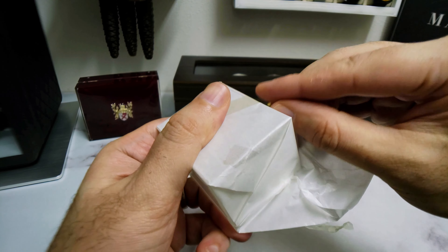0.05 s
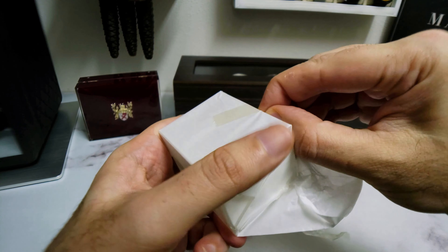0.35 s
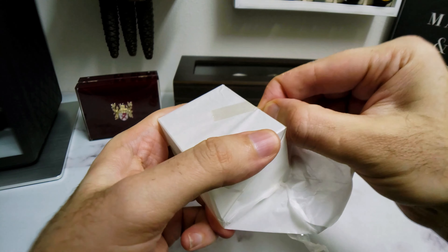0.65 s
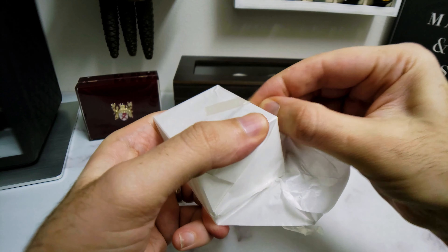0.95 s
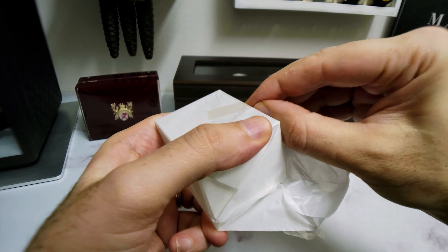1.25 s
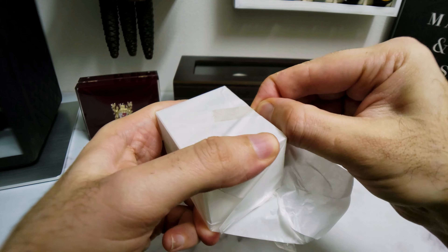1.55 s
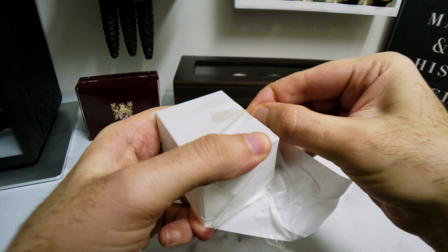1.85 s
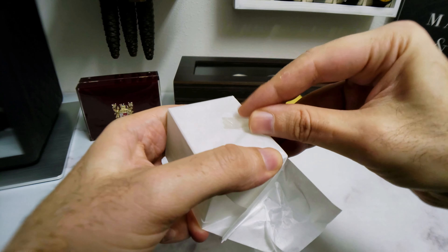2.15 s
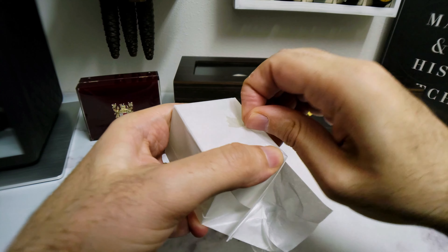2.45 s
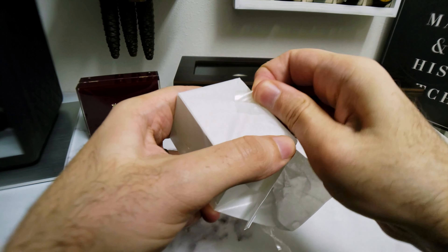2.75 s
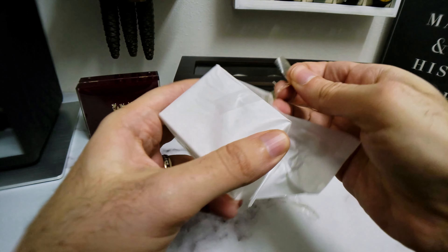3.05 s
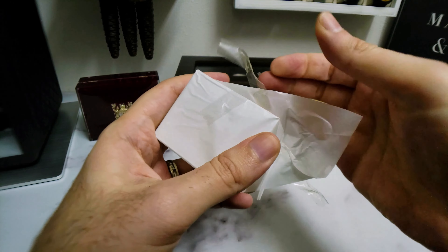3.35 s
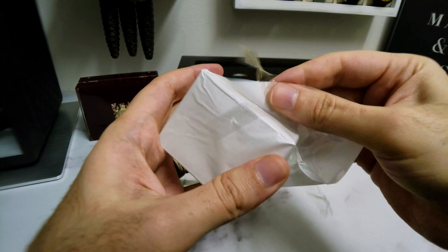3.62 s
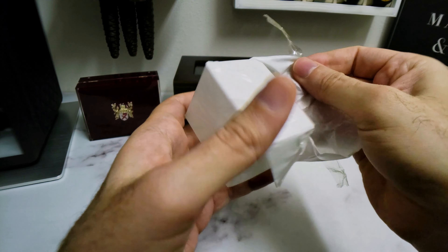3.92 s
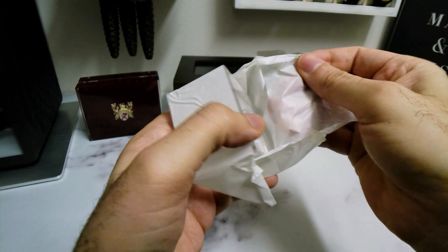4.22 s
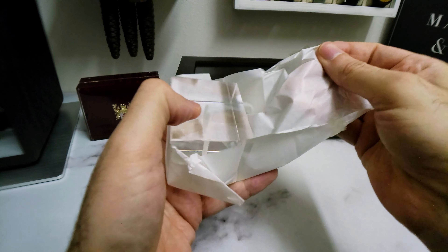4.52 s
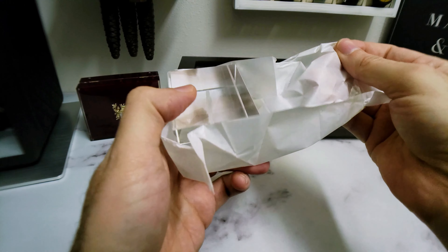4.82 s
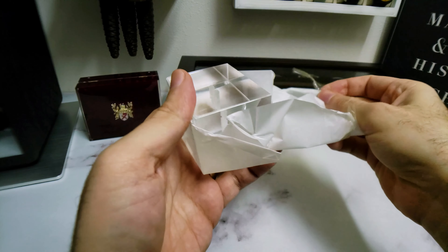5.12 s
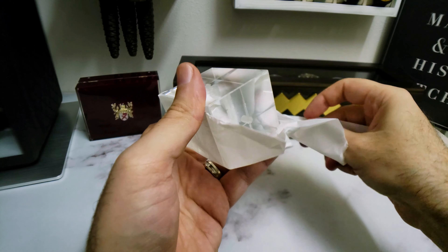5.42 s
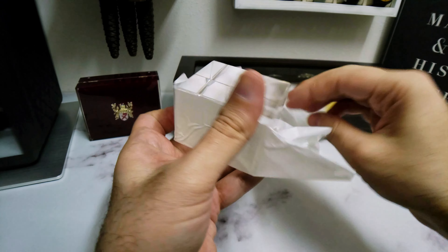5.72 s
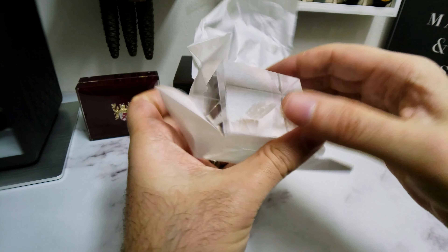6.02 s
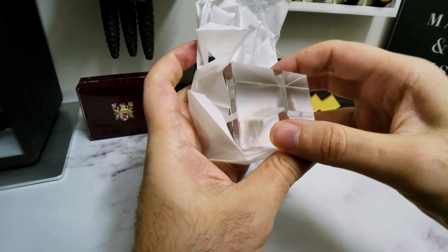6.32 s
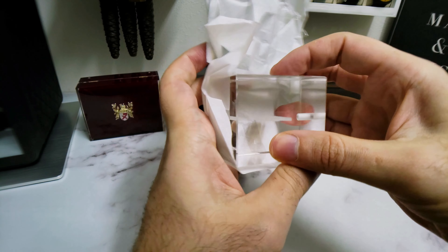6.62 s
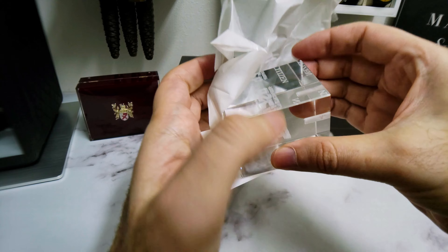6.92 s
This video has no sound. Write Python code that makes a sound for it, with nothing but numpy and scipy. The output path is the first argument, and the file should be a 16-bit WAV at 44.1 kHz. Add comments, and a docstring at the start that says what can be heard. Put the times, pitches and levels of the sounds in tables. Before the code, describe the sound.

Thin wrapping paper ticks and snaps as tape is peeled away, then crinkles densely as hands unwrap a small object.

```python
"""A desk in a quiet room, close to a stereo microphone. Fingers pick at the tape on a small
paper-wrapped glass block, peel it off, unfold the crinkly paper and lift the block out.
Each buckling crease snaps and rings briefly in the sheet; swarms of tiny creases crackle between
the snaps. Fingers bump and rub the parcel, over a low room murmur and microphone hiss."""
import sys
import numpy as np
from scipy import signal
from scipy.fft import rfft, irfft
from scipy.io import wavfile
from scipy.ndimage import uniform_filter1d

SR = 44100
rng = np.random.default_rng(int(sys.argv[2]) if len(sys.argv) > 2 else 0)


def materialize(psi):
    """Save the field psi as 16-bit PCM at rate SR to the path in sys.argv[1].

    A 1-D psi becomes a single channel; in a 2-D psi each row is a channel.
    """
    bounded = np.clip(np.atleast_2d(psi).T, -1, 1)
    quanta = np.round(bounded * 32767).astype(np.int16)
    wavfile.write(sys.argv[1], SR, quanta)


N = 316197
TIME = np.arange(N) / SR
SIZE = 8192  # samples in one hit
AGE = np.arange(SIZE) / SR
HZ = np.maximum(np.fft.rfftfreq(SIZE, 1 / SR), 1)


# Snap cues: a nail picks, the tape peels (from 2.5 s), the sheet unfolds (3.6 s), the block lifts (6 s).
# Level sets the treble; the body of the sheet (mids) and hollow of the parcel (lows) are relative to it.
# (time [s], level [dB], body [dB], hollow [dB], ring [Hz])
SNAP_CUES = [ (.009, -8.5, -7.5, -19.5, 1930), (.024, -16.5, -6.5, -11.5, 2730),
             (.158, -31, -3.5, -13.5, 3530), (0.193, -32.5, -4, -17, 9500), (.223, -11, -1.5, -22, 2000),
             (.23, -19.5, -5, -9, 1680), (.322, -23.5, -1.5, -27, 1650), (.425, -35.5, 4.5, -12, 1530),
             (0.475, -22, -20, -50, 8600), (.511, -27, -13, -41, 6500), (.576, -24, -12, -35, 4700),
             (0.601, -32.5, -11, -38, 4300), (.667, -26, -1, -12, 5580), (0.759, -9, -3.5, -14, 2200),
             (.806, -32, -2, -6, 3490), (0.909, -32, -7.5, -43, 3280), (1.012, -23.5, 1, -6, 1580),
             (1.039, -23.5, -7, -18, 11100), (1.086, -22, -32, -18, 5080), (1.155, -19.5, -2.5, -12.5, 930),
             (1.209, -25.5, -8, -22, 9200), (1.256, -17.5, -25, -39, 4700), (1.332, -9, -5, -7, 1940),
             (1.479, -29, -2, -21.5, 8100), (1.564, -15, -8.5, -53, 4000), (1.587, -23, -14, -42, 9500),
             (1.644, -21.5, -10.5, -14, 1000), (1.71, -24.5, -16.5, -46, 3880),
             (1.903, -17.5, -16, -35, 3680), (1.925, -26.5, -7, -23, 10600), (1.965, -25, -5, -10, 1590),
             (1.973, -22.5, -6.5, -8.5, 1570), (2.113, -18, -16.5, -28, 11000),
             (2.172, -30.5, -10.5, -20, 11100), (2.312, -20.5, -23.5, -33, 10100),
             (2.391, -27, -7, -44, 8300), (2.431, -25.5, -9, -22, 11500), (2.502, -16, -14.5, -28, 9600),
             (2.695, -18.5, -13, -46, 9550), (2.779, -21.5, -11.5, -10, 1800),
             (2.817, -17.5, -10, -22, 1810), (2.835, -13.5, -15, -22, 8460), (2.864, -10.5, -13, -22, 6450),
             (2.874, -16.5, -3.5, -15, 8400), (2.891, -19, -10, -19, 5500), (2.999, -26.5, -9, -7.5, 5270),
             (3.04, -22, -5.5, -6.5, 1140), (3.123, -30, 0.5, -5, 2960), (3.148, -43.5, 3, 4, 1420),
             (3.25, -17.5, -15, -6, 910), (3.255, -13, -2, -6.5, 3500), (3.586, -13.5, -7, -18.5, 11700),
             (3.622, -15, -3.5, -22, 6240), (3.702, -11.5, -10.5, -14, 1900), (3.807, -18, -2, -4.5, 1420),
             (3.849, -18.5, -6, -20, 5080), (3.917, -13.5, -5.5, -45, 5750), (3.972, -21, 2.5, -0.5, 2070),
             (3.988, -7, -13, -22, 4940), (4.014, -13, -8.5, -21, 1450), (4.077, -19.5, 4, 0, 2700),
             (4.097, -12, -2, -7, 1010), (4.18, -15.5, -29, -5, 1540), (4.245, -24, 2, -18, 2330),
             (4.305, -11.5, -4.5, -13, 5160), (4.442, -19.5, 3, -3.5, 6650), (4.447, -8.5, -14, -32, 4900),
             (4.622, -20.5, -7.5, -9, 2750), (4.716, -22.5, -7.5, -3, 780), (4.782, -23.5, -4, -7.5, 9500),
             (4.834, -12.5, -7.5, -9.5, 2920), (4.889, -18.5, -6, -10, 3230), (4.945, -20, 3, -1, 1500),
             (4.961, -18, -2.5, -19, 4870), (5.006, -15, -5.5, -20, 4700), (5.116, -20, -7.5, -3, 1860),
             (5.208, -14, -8, -18, 3900), (5.223, -14, -6, -22, 4080), (5.288, -17.5, -8, -16, 9500),
             (5.332, -23, 1.5, -28, 9200), (5.429, -11.5, -11.5, -15.5, 1290), (5.468, -10, -8, -10, 2060),
             (5.753, -18.5, -10, -8.5, 8700), (5.782, -28.5, -2, 3.5, 9500), (5.813, -25, -16, -17, 1040),
             (5.876, -25, -5, -25, 6400), (5.975, -22, 1.5, -13, 2130), (6.092, -14.5, -3, -11, 8200),
             (6.179, -19, -6, -11, 1400), (6.227, -18, -20, -9, 1280), (6.321, -13, -0.5, -8.5, 1430),
             (6.395, -15, -20, -45, 10700), (6.416, -17.5, -6, -40, 7750), (6.465, -14, -9, -20, 1510),
             (6.555, -15, -2.5, -17, 9900), (6.608, -17.5, -17, -39, 5700), (6.708, -12, -15, -22, 1160),
             (6.855, -11.5, -22, -20, 1320), (6.926, -19.5, -11, -30, 2750),
             (7.152, -20.5, -3, -11.5, 2320)]

def snaps(direct_db=-2, t60=0.068, mode_db=7.5, mode_octaves=0.2, level_db=-2.0):
    """Big creases and the tape let go one at a time, each with one leading resonance."""
    band_widths_hz = np.diff([550, 1500, 5000, 16000])
    burst_db = 10 * np.log10(0.001 * SR * SR / 2 / band_widths_hz)  # a 1 ms burst's energy in each band
    out = np.zeros((2, N))
    for s, db, body_db, hollow_db, hz in SNAP_CUES:
        low, mid, high = db + np.array([hollow_db, body_db, 0]) + burst_db
        shape = [(100, low - 18), (480, low - 8), (650, low), (1250, low),
                 (1900, mid), (4200, mid), (6200, high), (16000, high)]
        shape_db = contour(shape, HZ) + resonance(hz, mode_db, mode_octaves) + level_db
        # taut paper cracks sharply; the opened sheet gives way more softly
        attack_db = direct_db + np.interp(s, [3.4, 3.8], [0.2, -2.8])
        add(out, s, facet(shape_db, attack_db, t60))
    return out


def facet(shape_db, direct_db, t60, ripple_db=2, pan_db=0.75, flutter=0.35):
    """One facet of paper flips: a sharp pulse with its own resonances, then sheet and desk nook ring."""
    knots_hz = np.geomspace(500, 16000, num=40)
    ripple = even(np.interp(HZ, knots_hz, ripple_db * rng.standard_normal(len(knots_hz))))
    # bending waves smear the flip in time while its spectrum stays flat
    flip = rng.standard_normal(SIZE) * fade(AGE, t60=0.0035) * flutter
    flip[0] += 1
    flat_flip = np.exp(1j * np.angle(rfft(flip)))
    # it reaches the two microphone ports in turn
    lag_s = (0.079 + 0.055 * rng.standard_normal()) / 1000
    delays_s = np.maximum([[-lag_s], [lag_s]], 0)
    direct = undb(direct_db) * flat_flip * np.exp(-2j * np.pi * HZ * delays_s)
    # the treble scatters more than the mids
    scatter = undb(contour([(2000, -3), (7000, 0.02)], HZ))
    ring = scatter * rfft(unit(burst(AGE, t60, rise_s=0.00052)))
    response = irfft((direct + ring) / np.hypot(undb(direct_db), scatter))
    response *= AGE < .9 * AGE[-1]  # mute the wrapped-around end
    pan = undb(pan_db * rng.standard_normal() * np.array([[1], [-1]]))
    return pan * convolve(pulse(shape_db + ripple), response)


def crackle(rate_per_s=750, rate_at_db=-33, spread_db=8.0, direct_db=-1.0, t60=0.052, pitch_count=18):
    """Swarms of tiny creases: large facets pop with a pitch, small ones tick; sliding paper hisses."""
    strength, dullness, sliding = hand_effort()
    # gentle picking gives lone ticks, firm crumpling a dense swarm
    per_second = rate_per_s * np.sqrt(strength / undb(rate_at_db))
    fires = rng.random(N) < per_second / SR
    creases = fires * undb(spread_db * np.minimum(rng.exponential(size=N), 4))
    # the hand supplies the energy: a big slip leaves less for its neighbours
    creases /= np.sqrt(np.abs(uniform_filter1d(creases ** 2, int(.03 * SR))) + 1e-6)
    creases *= np.sqrt(1 - sliding)
    hiss = np.sqrt(undb(-6) ** 2 + sliding)
    which_facet = rng.integers(0, pitch_count, N)
    # (frequency [Hz], gain [dB])
    pop_eq = [(60, -18.0), (170, -8.5), (380, 1.5), (700, 0.5), (1300, 1.5), (2200, 3.0),
              (4200, 0), (6500, -3.0), (16000, -28.5)]
    tick_eq = [(100, -23), (2500, -24.5), (4200, 1), (6000, 2.0), (11000, 4.0), (16000, -1.0)]
    layers = [(pop_eq, dullness, (900, 4900), 11.5), (tick_eq, 1, (5000, 15000), 5)]
    out = np.zeros((2, N))
    for eq, share, range_hz, mode_db in layers:
        shape_db = contour(eq, HZ)
        drive = strength * share / np.sqrt(1 + dullness ** 2)
        for k, hz in enumerate(np.linspace(*range_hz, pitch_count)):
            pitched_db = even(shape_db + resonance(hz, mode_db, octaves=0.11))
            out += convolve(creases * drive * (which_facet == k), facet(pitched_db, direct_db, t60))
        out += convolve(hiss * drive * rng.standard_normal(N), facet(even(shape_db), direct_db, t60))
    return taut_paper(out)


# Single scrapes and pulls on the paper; dullness tips the crackle from ticks towards pops.
# (start [s], hold [s], level [dB], dullness [dB])
PULL_CUES = [(0.294, 0.0062, -41.5, -12), (.352, .01, -49, -4), (0.544, 0.027, -51, -8),
             (0.674, .005, -43, -13), (0.743, 0.023, -50, 5.5), (0.778, 0.0084, -41, 8),
             (0.892, .015, -52, -5), (0.988, 0.022, -39, -9.5), (1.035, 0.12, -43.5, -5),
             (1.298, 0.059, -38.5, -12), (1.545, 0.12, -44, -7), (1.892, .01, -52.5, -9),
             (1.976, .005, -41.5, -4), (2.255, 0.018, -49.5, -8), (2.45, 0.027, -44, -8.5),
             (2.582, 0.27, -46.5, -10.5), (2.841, 0.066, -33, -9.5), (3.002, 0.15, -48.5, 1),
             (3.532, 0.027, -47, -8), (3.597, 0.12, -31, -9), (3.749, 0.12, -29, -4.5),
             (3.956, 0.049, -29.5, -3), (4.064, .05, -27.5, 0.5), (4.153, 0.051, -29, -3.5),
             (4.241, 0.081, -28.5, -6.5), (4.361, 0.14, -31.5, -2), (4.547, 0.043, -35, -3.5),
             (4.793, 0.067, -37, -5), (4.928, 0.038, -28.5, -1.5), (5.077, 0.066, -33.5, -6.5),
             (5.191, 0.038, -31.5, -6), (5.267, 0.012, -26.5, -4.5), (5.327, 0.0079, -34, -19),
             (5.398, 0.2, -32.5, -5), (5.583, 0.024, -30.5, -9), (5.666, 0.035, -34, -8.5),
             (5.731, 0.053, -35, -5.5), (5.883, 0.07, -43, -12), (6.002, 0.095, -32.5, -6),
             (6.224, 0.041, -34, -2), (6.253, 0.011, -42, 2), (6.42, 0.017, -38, -14),
             (6.556, 0.039, -31.5, -6.5), (6.677, 0.063, -28.5, -7.5), (6.835, 0.049, -32.5, -3.5),
             (6.903, 0.022, -37.5, 8)]
# The crackle bed: how firmly the fingers hold and slide between pulls.
# (time [s], level [dB], dullness [dB])
GRIP_RIDE = [(0, -34.5, -2), (.12, -58, -4), (.36, -60, 0), (.85, -65.5, 0), (1.239, -78, -2),
             (1.39, -50, 1), (1.72, -65.5, -9), (1.8, -72, -8.5), (2.2, -61, 10), (2.55, -64, -19),
             (3.2, -52.5, 6), (3.36, -88, -1.5), (3.68, -43, -3.5), (4.5, -36, -13), (4.74, -50.5, 0),
             (5.55, -35.5, 6), (5.85, -50.5, 2), (6.3, -41, -4), (6.99, -54, 8), (7.1, -41.5, 3)]

def hand_effort(swarm_db=-32, swarm_dull_db=-8.5, sliding_share=0.29):
    """Grip, pulls and the swarm around each snap sum to the crackle's strength, dullness and sliding."""
    t = np.arange(0, TIME[-1], 0.001)
    s, grip_db, grip_dull_db = np.transpose(GRIP_RIDE)
    grip_db = np.interp(t, s, grip_db)
    parts = [(grip_db, np.interp(t, s, grip_dull_db))]
    for start, hold, db, dull_db in PULL_CUES:
        parts.append((db + swell(t, start, hold, rise=798.5, fall=438.5), dull_db))
    for start, db, *_ in SNAP_CUES:  # a snap lets smaller creases go around it
        parts.append((db + swarm_db + swell(t, start, 0, rise=1098.5, fall=448.5), swarm_dull_db))
    power = sum(undb(db) ** 2 for db, _ in parts)
    dullness_db = sum(undb(db) ** 2 * dull_db for db, dull_db in parts) / power
    # part of the grip's energy is smooth sliding instead of creasing
    sliding = sliding_share * undb(grip_db) ** 2 / power
    return [np.interp(TIME, t, control) for control in (np.sqrt(power), undb(dullness_db), sliding)]


def taut_paper(x, edge_hz=900, opens_s=3.7, loose_s=5, bass_cut=0.45):
    """Paper stretched over the block radiates less bass until it hangs loose."""
    bass = signal.sosfiltfilt(signal.butter(2, edge_hz, fs=SR, output="sos"), x)
    return x - bass * np.interp(TIME, [opens_s, loose_s], [bass_cut, 0])


# Finger thumps on the parcel: (time [s], level [dB], pitch [Hz], width [octaves])
BUMP_CUES = [(0.762, -47, 247, 0.23), (1.009, -22.5, 640, 0.73), (1.011, -37.5, 276, 0.69),
             (1.972, -49, 260, 0.51), (2.869, -30, 310, 1.9), (2.889, -33, 203, 1.8),
             (3.254, -30.5, 150, 1.7), (3.587, -25.5, 240, 2.6), (4.307, -24, 340, 0.61),
             (4.45, -28.5, 320, 1.1), (4.944, -28, 220, 2.1), (5.581, -31.5, 307, 0.78),
             (5.598, -38.5, 92, 0.36), (5.759, -35, 280, 1.9), (5.785, -42.5, 70, 0.62),
             (6.09, -27, 710, 0.27), (6.717, -31, 300, 2.3), (6.73, -27, 750, 0.28), (6.872, -35, 230, 2.1)]

def finger_bumps(t60=0.092, t60_at_hz=250, damping=0.39, soft_hz=1500, level_db=1):
    """Soft fingers thump the paper against the block: a short, low ring."""
    rolloff_db = -20 * np.log10(1 + (HZ / soft_hz) ** 2)
    out = np.zeros((2, N))
    for s, db, hz, octaves in BUMP_CUES:
        peak_db = -20 * np.log10(1 + (np.log2(HZ / hz) / octaves) ** 2)
        push = burst(AGE, t60 * (t60_at_hz / hz) ** damping, rise_s=0.00022)  # higher knocks die sooner
        thump = convolve(pulse(peak_db + rolloff_db), push)
        add(out, s, thump / np.abs(thump).max() * undb(db + level_db))
    return out


# Fader ride for skin sliding over the wrapped block: (time [s], level [dB])
RUB_RIDE = [(0, -77), (1.048, -72.5), (1.799, -88), (2.701, -77), (3.05, -57), (3.351, -72.5), (3.6, -70.5),
            (4.35, -41.5), (4.66, -58.5), (4.78, -44), (4.9, -51), (5.92, -82), (6.1, -58.5), (7.17, -54)]

def skin_rub(hollow_hz=725, width_hz=160, uneven_db=4, grip_s=0.017, level_db=-4):
    """Skin grips and slips on the parcel and stirs one hollow resonance."""
    s, db = np.transpose(RUB_RIDE)
    grips = np.arange(0, TIME[-1], grip_s)
    stick_slip_db = uneven_db * np.interp(TIME, grips, rng.standard_normal(len(grips)))
    friction = diffuse(N) * undb(np.interp(TIME, s, db) + stick_slip_db + level_db)
    hollow = unit(np.sin(2 * np.pi * hollow_hz * AGE) * np.exp(-np.pi * width_hz * AGE))
    return convolve(friction, hollow[None])


# Tone of the desk and each microphone port: (frequency [Hz], gain [dB])
LEFT_EQ = [(40, -12), (260, -1), (530, -7), (695, 5), (920, -5), (1070, -1.5), (1300, -2.5), (2900, 2.5),
           (4000, 5), (5000, -1), (7000, 5), (8400, -5.5), (12000, 3), (15500, 4)]
RIGHT_EQ = [(40, -9), (350, -6.5), (560, -9), (700, 3), (830, -10.5), (1000, -1), (1200, -6), (2000, -4),
            (3500, -7.5), (5200, -8.5), (8000, -7), (11800, 4.5), (15500, -2)]

def desk_and_ports(x):
    """The desk and the two ports colour each side differently."""
    return convolve(x, np.array([pulse(contour(eq, HZ)) for eq in (LEFT_EQ, RIGHT_EQ)]))


def room_reverb(x, t60=0.12, wet_db=-22, dull_hz=6000):
    """A small furnished room adds a faint, dull tail."""
    tail = burst(np.arange(SR // 2) / SR, t60, rise_s=0.002)
    pole = np.exp(-2 * np.pi * dull_hz / SR)
    return x + undb(wet_db) * convolve(x, unit(signal.lfilter([1], [1, -pole], tail)))


# Spectrum of the still room: (frequency [Hz], relative level [dB])
ROOM_TONE_EQ = [(20, -34), (40, -17), (56, 7.5), (75, -1), (102, 2.5), (135, -9), (280, -6), (450, -27),
                (700, -18.5), (1000, -31.5), (4000, -36.5), (16000, -26.5)]

def room_tone(level_db=-76):
    """Steady low room murmur and microphone hiss."""
    hz = np.maximum(np.fft.rfftfreq(N, 1 / SR), 1)
    noise = irfft(rfft(diffuse(N)) * undb(contour(ROOM_TONE_EQ, hz)), N)
    return unit(noise) * np.sqrt(N) * undb(level_db)


def undb(db):
    """Decibels to gain."""
    return 10 ** (np.asarray(db) / 20)


def unit(x):
    """Scale to an energy of one."""
    return x / np.sqrt(np.sum(x ** 2, axis=-1, keepdims=True))


def even(db):
    """Shift a spectrum in dB to a mean power of one."""
    return db - 10 * np.log10(np.mean(undb(db) ** 2))


def fade(age, t60):
    """Exponential decay by 60 dB in t60 seconds."""
    return np.exp(-np.log(1000) * age / t60)


def swell(t, start, hold, rise, fall):
    """Attack, hold and release in dB; rise and fall are in dB a second."""
    return -rise * np.maximum(start - t, 0) - fall * np.maximum(t - start - hold, 0)


def contour(points, hz):
    """Read an EQ curve of (Hz, dB) points on a log-frequency axis."""
    f, db = np.transpose(points)
    return np.interp(np.log(hz), np.log(f), db)


def resonance(hz, db, octaves, drawn=0.21):
    """A facet's leading resonance in dB: it draws energy from the frequencies around it."""
    away = (np.log2(HZ / hz) / octaves) ** 2
    return db * ((1 + drawn) / (1 + away) - drawn / (1 + away / 25))


def pulse(db):
    """The tightest causal pulse with this spectrum (minimum phase)."""
    cepstrum = irfft(db * np.log(10) / 20)
    cepstrum[1:SIZE // 2] *= 2
    cepstrum[SIZE // 2 + 1:] = 0
    return irfft(np.exp(rfft(cepstrum)))


def diffuse(size, split_hz=2200):
    """Stereo noise, narrow in the bass and wide in the treble."""
    mid, side = rfft(rng.standard_normal((2, size)))
    likeness = 0.75 / (1 + (np.fft.rfftfreq(size, 1 / SR) / split_hz) ** 2)
    mid, side = mid * np.sqrt(1 + likeness), side * np.sqrt(1 - likeness)
    return irfft(np.array([mid + side, mid - side]), size)


def burst(age, t60, rise_s):
    """Stereo noise with a quick attack and an exponential tail."""
    return diffuse(len(age)) * fade(age, t60) * (1 - np.exp(-age / rise_s))


def convolve(x, response):
    """Pass a sound through a stereo response."""
    return signal.fftconvolve(np.atleast_2d(x), response, axes=1)[:, :x.shape[-1]]


def add(out, s, sound):
    """Mix a sound in at time s."""
    i = int(np.clip(s * SR, 0, N - 1))
    out[:, i:i + sound.shape[-1]] += sound[..., :N - i]


def scene():
    """Paper and fingers up front, coloured by room, desk and ports, over the room tone."""
    foley = snaps() + crackle() + finger_bumps() + skin_rub()
    return desk_and_ports(room_reverb(foley)) + room_tone()


def record(dry, top_hz=15900):
    """A steep low-pass cuts the very top."""
    return signal.sosfilt(signal.ellip(10, .2, 70, top_hz, fs=SR, output="sos"), dry)


dry = scene()
out = record(dry)
materialize(out)
```